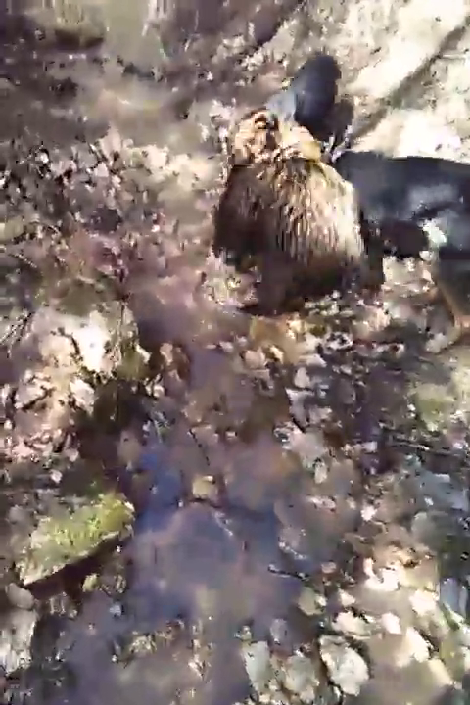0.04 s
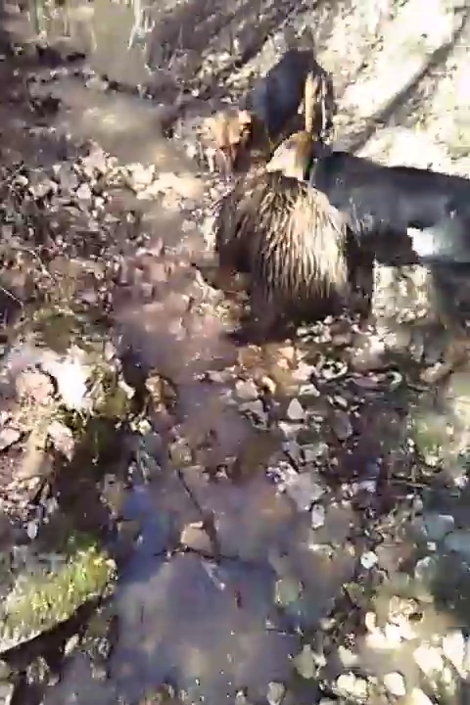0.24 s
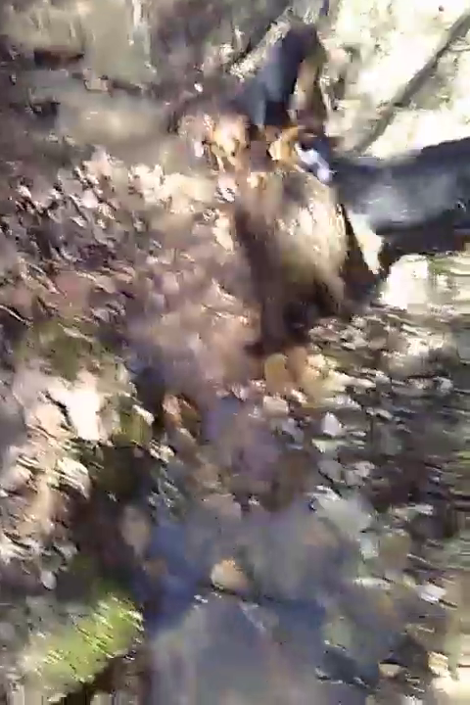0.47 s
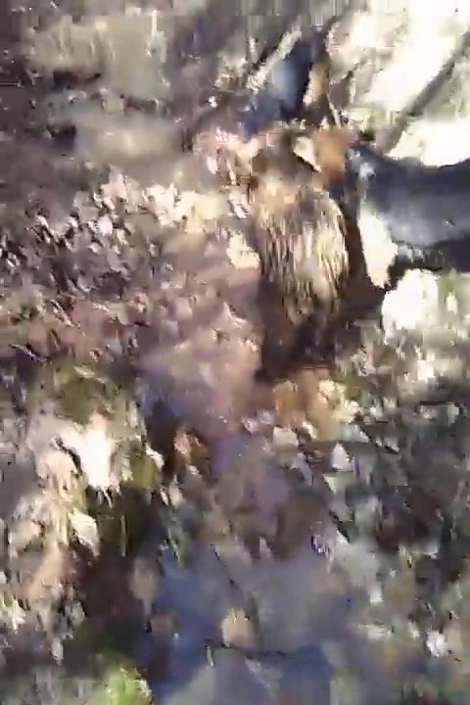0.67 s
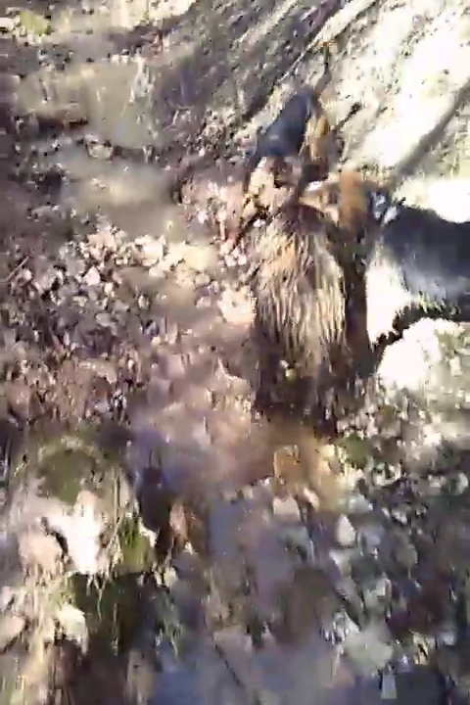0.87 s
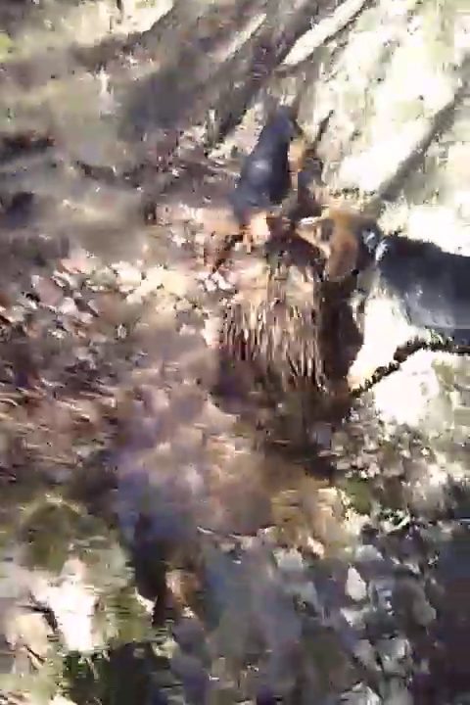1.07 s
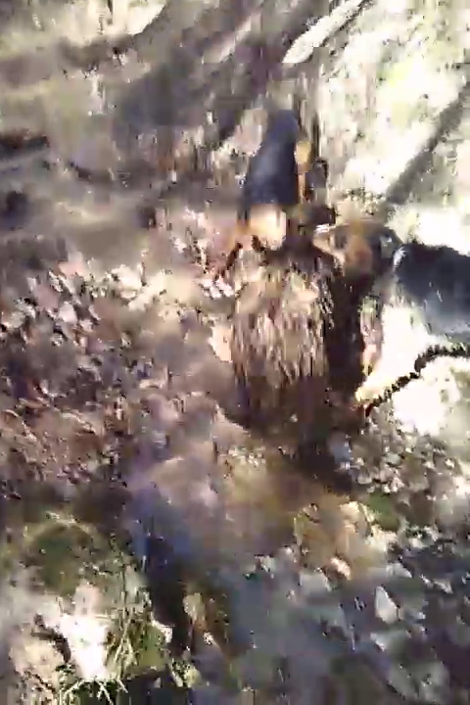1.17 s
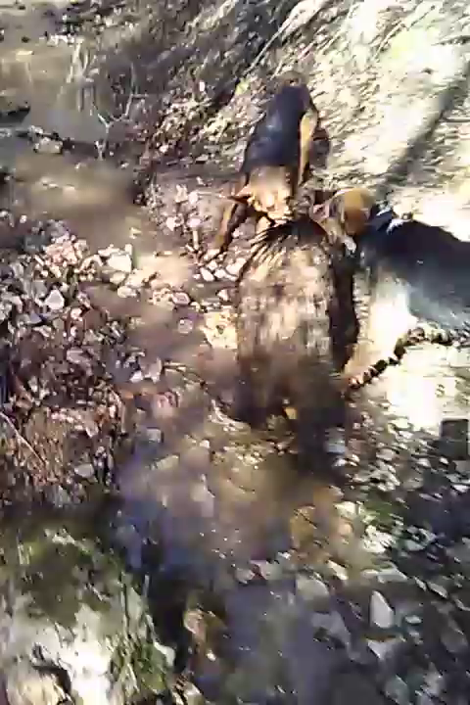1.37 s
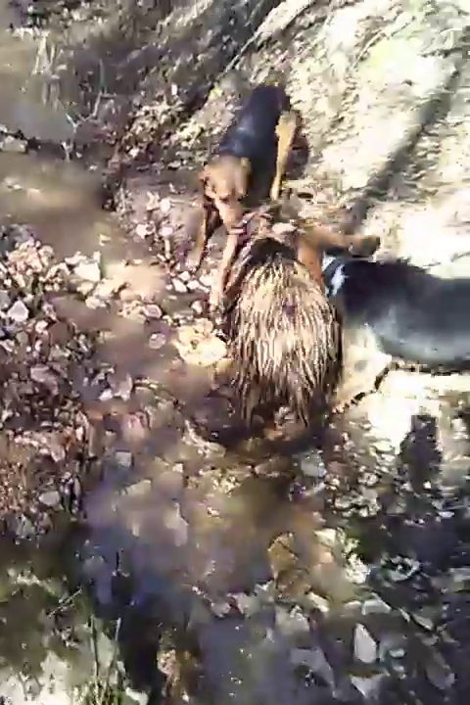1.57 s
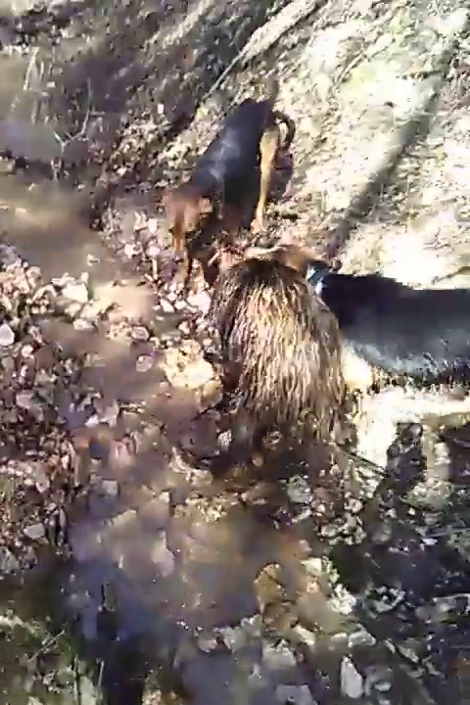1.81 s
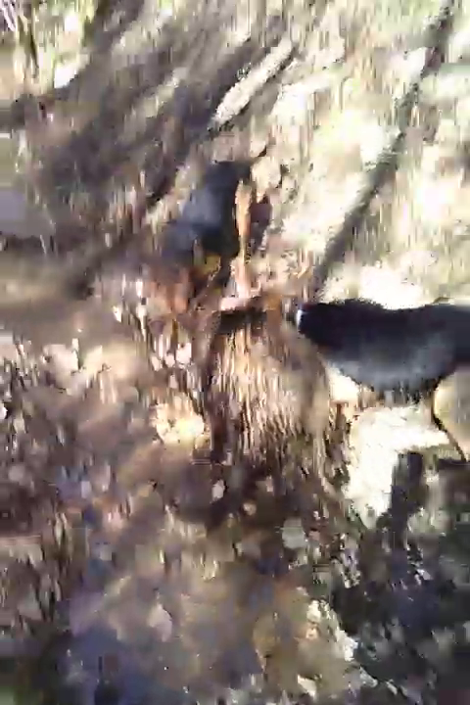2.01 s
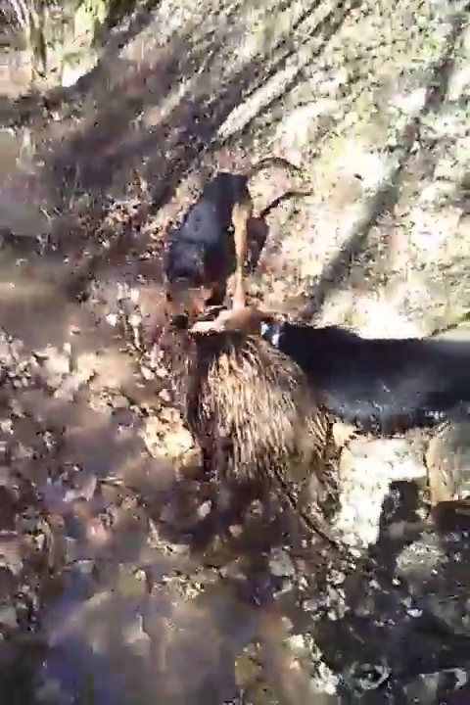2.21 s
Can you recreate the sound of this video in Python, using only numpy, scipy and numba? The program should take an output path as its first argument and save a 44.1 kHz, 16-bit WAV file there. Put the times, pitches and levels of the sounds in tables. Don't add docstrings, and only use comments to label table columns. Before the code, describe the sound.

A young boar gives one long rasping scream, rising then sinking; a dog barks once midway, another whines faintly, leaves crackle and a collar bell ticks, heard close on a hand-held phone outdoors among rocks.

```python
import sys
import numpy as np
from scipy import signal
from scipy.fft import rfft, irfft, next_fast_len
from scipy.io import wavfile
from scipy.ndimage import uniform_filter1d, map_coordinates
from numba import njit

SR = 44100
rng = np.random.default_rng(int(sys.argv[2]) if len(sys.argv) > 2 else 0)


def rack_gain(trim_db):
    fader = np.asarray(trim_db, float)
    return 10 ** (fader / 20)


def digitize_waveform(pressure):
    field = np.atleast_2d(pressure).T
    bounded = np.clip(field, -1, 1)
    quanta = np.round(bounded * 32767).astype(np.int16)
    wavfile.write(sys.argv[1], SR, quanta)


N = 99225

# (time [s], length [s], level [dB])
WIND_PUFFS = [(-.03, 0.076, -56), (0.297, 0.045, -64), (1.9, 0.074, -69), (1.64, 0.08, -60.5),
              (2.5, 0.19, -67), (.42, 0.073, -66), (1.9, 0.062, -68)]
WIND_DB, WIND_HZ, WIND_FLICKER_DB, RUMBLE_CUT_HZ = -73, 64, 4, 45

# (frequency [Hz], density [dB per Hz])
LEAF_COLOUR = [(120, -2.5), (900, -3.5), (1750, -0.5), (2500, -0.5), (4000, -8), (8300, 3), (11000, -6),
               (14000, -18.5)]
# (time [s], level [dB])
STRUGGLE_EFFORT = [
    (0, 2.5),
    (.15, 4),
    (1.6, 14),
    (1.82, -3),
    (1.87, -1),
    (1.95, 1.5),
    (2.1, -1),
    (2.25, -5.5),
]
LEAF_DB, LEAF_CUT_HZ, LEAF_SWELL_DB, LEAF_FLICKER_DB = -45.5, 246, 1, 2.5
CRACKLE_RATE, CRACKLE_SPREAD_DB, CRACKLE_DB = 900, 3, -8

# (time [s], level [dB], centre [Hz], low knock [dB])
CRACKS = [(0.384, -16, 8560, -18), (1.048, -19, 8844, -15), (1.672, -40, 4474, -27),
          (1.691, -22, 8560, -17), (1.699, -50, 8260, -43), (1.71, -43, 7750, -49), (1.783, -47, 8600, -18),
          (1.784, -22, 8600, -30), (1.832, -40, 3330, -34), (1.88, -46, 8900, -28), (1.942, -38, 8500, -11),
          (1.987, -45, 8200, -21)]
CRACK_S, CRACK_TAIL_S, CRACK_TAIL_DB, KNOCK_HZ = 0.001, 0.011, -12, 1100

# (time [s], level [dB], ring before the fur damps it [s], brightness [dB])
CLAPPER_HITS = [(0.066, -38.5, 0.02, -27), (0.125, -38.5, 0.0088, -24), (1.609, -32, 0.046, -3.5),
                (1.749, -42, 0.041, 1), (1.753, -61, 0.018, 5), (1.761, -50.5, 0.024, 9),
                (2.162, -52, .025, -13), (2.198, -42, 0.0078, -20), (2.232, -38.5, 0.055, -16)]
# (frequency [Hz], level [dB], t60 [s])
BELL_MODES = [(2380, -4.5, 0.29), (3410, -13.5, 0.29), (5655, -7.5, 0.15), (6210, 4, 0.095),
              (6790, -13, 0.039), (8600, 0, 0.096), (9800, 1, 0.044)]
BELL_DAMP_S, CLAPPER_DB = .008, 1

# (time [s], pitch [Hz], level [dB])
WHINE = [(.84, 449.4, -70), (0.899, 428, -56), (0.989, 415.5, -56.5), (1.1, 430.5, -61), (1.42, 420, -61),
         (1.46, 413, -55), (1.541, 454, -68), (1.6, 427, -72)]

# (time [s], pitch [Hz], level [dB], mouth resonance [Hz])
BARK_ARCH = [
    (0.6, 345, -29, 1300),
    (.635, 435.5, -29, 1450),
    (.655, 513.2, -26.5, 1580),
    (0.695, 594.8, -21.5, 1620),
    (.715, 568.2, -19, 1640),
    (0.736, 416.6, -20, 1180),
    (.772, 309.7, -25.5, 943),
    (.788, 316.4, -46, 1250),
    (0.861, 312, -37.5, 970),
    (0.951, 264, -49.5, 800),
]
# (share of the mouth resonance [ratio], width [Hz], level [dB])
DOG_RESONANCES = [
    (.7, 300, -0.5),
    (1.0, 380, 5.5),
    (1.45, 399, -27),
]
# (time [s], length [s], level [dB])
DOG_PANTS = [
    (1.9, 0.15, -49.5),
    (-.03, 0.1, -50),
]
# (frequency [Hz], width [Hz], level [dB])
PANT_RESONANCES = [(1180, 310, 8.5), (2200, 930, -0.5), (600, 79, 0)]
DOG_CHEST_HZ, DOG_CHEST_DB, DOG_ROUGHNESS = 392.3, -3, .45

# (time [s], pitch [Hz], level [dB], roughness [0-1], mouth resonance [Hz], mouth ring [dB])
OPENING_CRY = [(0.1, 204.6, -62, 0.26, 1180, -7), (.17, 236.1, -42.5, 0.36, 1180, 10.5),
               (.2, 245.7, -31, 0.63, 1204, 7), (0.233, 270.9, -31, 0.52, 1350, -0.5),
               (0.275, 240.8, -24.5, 0.23, 1200, -24), (0.31, 263.5, -27, 0.04, 1340, 1),
               (0.352, 273.4, -29.5, 0.03, 1384, 3.5), (0.379, 266.6, -27.5, 0.49, 1330, 3.5),
               (0.401, 218.4, -26.5, 0.68, 1250, -4), (0.446, 250, -28.5, 0.49, 1330, 1),
               (.5, 283.1, -29.5, 0.05, 1420, -4), (.585, 291.4, -27, 0.12, 1440, 3.5),
               (0.619, 311.8, -24, 0.31, 1541, 1), (0.662, 314.8, -27, 0.39, 1510, 16),
               (0.751, 319.5, -27, 0.4, 1592, 7)]
# (time [s], pitch [Hz], level [dB], roughness [0-1], mouth resonance [Hz], mouth ring [dB])
HELD_CRY = [(0.795, 312.9, -26, .5, 1560, 1.5), (0.833, 306.4, -35.5, .5, 1530, -2.5),
            (0.879, 305.7, -28.5, 0.41, 1476, 4.5), (0.949, 305.6, -27.5, 0.55, 1520, 8),
            (1.004, 310, -27, 0.33, 1545, 6), (1.03, 330, -26, 0.4, 1630, 9.5),
            (1.057, 334.7, -29.5, 0.31, 1662, 5), (1.086, 397.9, -29.5, 0.74, 1664, -4)]
# (time [s], pitch [Hz], level [dB], roughness [0-1], mouth resonance [Hz], mouth ring [dB])
SINKING_CRY = [(1.17, 437.7, -32.5, 0.72, 1323, -13), (1.299, 453.2, -25, 0.66, 1355, -14),
               (1.356, 438.3, -23.5, 0.5, 1510, 4), (1.383, 399.3, -27.5, 0.21, 1598, 6.5),
               (1.419, 396.5, -25.5, 0.22, 1575, 7), (1.44, 353.4, -25.5, 0.52, 1396, -10),
               (1.484, 345, -23, 0.66, 1421, -4), (1.53, 310.2, -26, 0.51, 1231, -3.5),
               (1.55, 309.4, -25.5, 0.41, 1232, 2), (1.582, 321.9, -27, 0.52, 1290, -3),
               (1.623, 271.4, -30.5, 0.55, 1100, -12)]
# (time [s], second resonance [Hz], third resonance [Hz], throat ring [dB], chest ring [dB])
TONGUE_SHIFTS = [(.1, 2600, 3350, 3, 21.5), (.19, 2480, 3240, -7, 0), (.27, 2600, 3400, -6.5, -17),
                 (.35, 2390, 3450, -20, -37), (.41, 2400, 3300, -13, -5.5), (.49, 2480, 3480, -24, -19),
                 (0.571, 2590, 3606, -21, -16), (.63, 2690, 3380, -12, -14), (.8, 2610, 3400, -22, -22),
                 (.95, 2620, 3500, -12, -15), (1.04, 2877, 3500, -15, -27), (1.1, 2457, 3600, -33, -36),
                 (1.2, 2546, 3410, -35, -21), (1.311, 2842, 3330, -36, -10), (1.41, 2754, 3570, -13.5, -22),
                 (1.45, 2620, 3453, -3, -21), (1.579, 2680, 3340, 0.5, -22), (1.631, 2544, 3256, 4.5, -17)]
# (frequency [Hz], width [Hz], level [dB])
UPPER_TRACT = [(4686, 590, -8), (5730, 500, 1.5), (6520, 570, -4.5), (7870, 416, 2.5), (9240, 550, -1.5),
               (10500, 1200, -13), (13000, 1200, -27.5)]
# (frequency [Hz], width [Hz])
NOSE_HOLLOWS = [(1900, 380), (4030, 220)]
TONGUE_WIDTH_HZ, TONGUE_DB = (280, 300), (1, 5)
MOUTH_WIDTH_HZ, TRACT_FOLLOW = 130, .15
THROAT_SHARE, THROAT_WIDTH_HZ = 0.62, 276
CHEST_HZ, CHEST_WIDTH_HZ, BOAR_CUT_HZ, RELEASE_S = 455, 290, 230, .012
WAVER_DB, THROAT_WAVER_DB, WAVER_RATE, WANDER = 2.6, 2.5, 24, .025

JITTER, SHIMMER_DB, BREATH_DB, BREATH_GATE, BREATH_FLOOR = .1, 6, -5, .6, .1
SMEAR_S, SMEAR_HZ = .0017, 400

# (frequency [Hz], left minus right [dB], left phase [rad], shared part [0-1])
LEFT_PORT = [(59.6, -5, -5, 0.91), (215, 1, -3.5, 1), (345, -5.5, -3, 0.88), (527, -3, -3, 0.91),
             (800, -5.5, -4, 0.81), (1080, -4, -4, 0.58), (1340, -6, -5, 0.86), (1860, 1, -4, 0.45),
             (1894, 0.5, -3.5, 0.36), (2280, 1.5, -5, 0.97), (2600, 2, -5.5, 0.91), (2980, -5, -7.5, 1),
             (3500, -3.5, -8, 0.43), (4240, -4, -6.5, 0.16), (6260, -16.5, -26, 0), (8900, -21.5, 25, .05),
             (12370, 2, -17.5, 0)]
ROCK_T60_S, ROCK_DB = .16, -13
SCATTER_S, SWAY_S, TOP_HZ = .004, .0003, 14400


@njit
def svf(x, hz, width):
    y, b, l = np.empty(len(x)), 0., 0.
    for i in range(len(x)):
        g, k = np.tan(np.pi * hz[i] / SR), width / hz[i]
        v = (b + g * (x[i] - l)) / (1 + g * (g + k))
        b, l, y[i] = 2 * v - b, l + 2 * g * v, k * v
    return y


def band(x, hz, width_hz):
    f = np.clip(hz + np.zeros(len(x)), 20, .45 * SR)
    return svf(svf(x, f, 1.93 * width_hz), f, 1.93 * width_hz)


def highpass(x, order, hz):
    return signal.sosfilt(signal.butter(order, hz, "high", fs=SR, output="sos"), x)


def unit(x):
    return x / np.sqrt(np.mean(x ** 2))


def walk(rate):
    k = int(SR / rate)
    return unit(uniform_filter1d(uniform_filter1d(rng.standard_normal(N), k), k))


def swell(t, start, length):
    return np.sin(np.pi * np.clip((t - start) / length, 0, 1)) ** 2


@njit
def folds(hz, jitter, shimmer, chance):
    out, phase, p, k = np.zeros(len(hz) + 16), np.empty(len(hz)), 0., 0
    for i in range(len(hz)):
        step = hz[i] * np.exp(jitter[i] * chance[k, 0]) / SR
        p += step
        if p >= 1:
            p, k = p - 1, k + 1
            for j in range(16):
                u = j - 8 + p / step
                out[i + j] += np.exp(shimmer[i] * chance[k, 1]) * np.sinc(u) * np.cos(np.pi * u / 17) ** 2
        phase[i] = p
    return out[8:-8], phase


def larynx(hz, rough):
    rough = np.clip(rough, 0, 1)
    chance = rng.standard_normal((N // 40, 2))
    chance[:, 0] = chance[:, 0] / 2 + uniform_filter1d(chance[:, 0], size=3)
    jitter = JITTER * rough ** 1.5 + 0.00259
    shimmer = SHIMMER_DB * rough * np.log(10) / 20
    clicks, phase = folds(hz, jitter, shimmer, chance)
    gated_air = np.exp(-phase / BREATH_GATE) * rng.standard_normal(N)
    breath = np.diff(unit(gated_air), prepend=0)
    f = np.arange(N // 2 + 1) * SR / N
    smear = np.exp(-2j * np.pi * SMEAR_S * (f + SMEAR_HZ * np.sin(f / SMEAR_HZ)))
    clicks = irfft(rfft(clicks * np.sqrt(SR / hz)) * smear, N)
    return np.sqrt(1 - 0.98 * rough) * clicks + rack_gain(BREATH_DB) * (rough + BREATH_FLOOR) * breath


def wind(t):
    puffs = rack_gain(WIND_DB) + sum(rack_gain(db) * swell(t, start, length) for start, length, db in WIND_PUFFS)
    rumble = unit(band(rng.standard_normal(N), WIND_HZ, 63.0))
    return highpass(rumble * puffs * rack_gain(WIND_FLICKER_DB * walk(7.1)), 2, RUMBLE_CUT_HZ)


def leaves(t):
    struck = rng.random(N) < CRACKLE_RATE / SR
    grains = struck * rack_gain(CRACKLE_SPREAD_DB * rng.exponential(size=N)) * rng.standard_normal(N)
    raw = rng.standard_normal(N) + rack_gain(CRACKLE_DB) * unit(grains)
    colour_hz, colour_db = np.array(LEAF_COLOUR).T
    out, shared = 0, walk(1.9)
    for hz in 120 * 2 ** np.arange(0, 7.1, .5):
        db = np.interp(np.log(hz), np.log(colour_hz), colour_db)
        db = db + LEAF_SWELL_DB * shared + LEAF_FLICKER_DB * walk(7.5)
        out = -out + rack_gain(db) * band(raw, hz, hz / 3)
    return unit(out) * rack_gain(LEAF_DB + np.interp(t, *np.array(STRUGGLE_EFFORT).T))


def snaps(t):
    out, u = np.zeros(N), t[:2048]
    decay = np.exp(-u / CRACK_S) + rack_gain(CRACK_TAIL_DB) * np.exp(-u / CRACK_TAIL_S)
    for start, db, hz, knock_db in CRACKS:
        burst = decay * rng.standard_normal(len(u))
        crack = band(burst, hz, 0.24 * hz)
        knock = rack_gain(knock_db + 7) * band(burst, KNOCK_HZ, 870.0)
        i = int(start * SR)
        out[i:i + len(u)] += rack_gain(db + 12) * (crack + knock)
    return out


def bell(t):
    out, (hz, db, t60) = np.zeros(N), np.array(BELL_MODES).T[:, :, None]
    chance = rng.random((len(CLAPPER_HITS), len(BELL_MODES)))
    for (start, level_db, ring, bright_db), turn in zip(CLAPPER_HITS, chance):
        i = int(start * SR)
        u = t[i:i + SR // 8] - start
        modes = rack_gain(db + bright_db * (hz > 3000)) * np.exp(-np.log(1000) * u / t60)
        modes = modes * np.sin(2 * np.pi * (hz * u + turn[:, None]))
        onset = 1 - np.exp(-u / 0.00054)
        fur = np.exp(-np.maximum(u - ring, 0) / BELL_DAMP_S)
        tick = rack_gain(CLAPPER_DB) * np.exp(-u / 0.0018) * np.diff(rng.standard_normal(len(u) + 1))
        out[i:i + len(u)] += rack_gain(level_db + 6.0) * (modes.sum(0) * onset * fur + tick)
    return out


def moan(t):
    s, hz, db = np.array(WHINE).T
    hz = np.interp(t, s, hz)
    level = rack_gain(np.interp(t, s, db, left=-120, right=-120) + 7.5)
    return unit(band(larynx(hz, DOG_ROUGHNESS + 0 * t), hz, 90.0)) * level


def bark(t):
    s, *cols = np.array(BARK_ARCH).T
    hz, db, mouth = (np.interp(t, s, c) for c in cols)
    source = larynx(hz, DOG_ROUGHNESS + 0 * t)
    voice = -rack_gain(DOG_CHEST_DB) * band(source, DOG_CHEST_HZ, 190.0)
    for k, (share, width, level_db) in enumerate(DOG_RESONANCES):
        voice = voice + (-1) ** k * rack_gain(level_db) * band(source, share * mouth, width)
    edge = np.clip((t - s[0]) / 0.011, 0, 1) * np.clip((s[-1] - t) / 0.02, 0, 1)
    return voice * edge * rack_gain(db + 14.5)


def pants(t):
    air = rng.standard_normal(N)
    pant = unit(sum(rack_gain(db) * band(air, hz, width) for hz, width, db in PANT_RESONANCES))
    effort = sum(rack_gain(db) * swell(t, start, length) ** .5 for start, length, db in DOG_PANTS)
    return pant * rack_gain(2.9 * walk(29)) * effort


def boar(t):
    s, *cols = np.array(OPENING_CRY + HELD_CRY + SINKING_CRY).T
    hz, db, rough, mouth, ring = (np.interp(t, s, c) for c in cols)
    at, *cols = np.array(TONGUE_SHIFTS).T
    *tongue, throat_db, chest_db = (np.interp(t, at, c) for c in cols)
    source = larynx(hz, rough)
    stretch = (mouth / 1400) ** TRACT_FOLLOW
    upper = list(zip(tongue, TONGUE_WIDTH_HZ, TONGUE_DB))
    upper += [(f * stretch, width, d) for f, width, d in UPPER_TRACT]
    voice = 0
    for k, (f, width, d) in enumerate(upper):
        gain = (-1) ** k * rack_gain(d + WAVER_DB * walk(WAVER_RATE))
        voice = voice + gain * band(source, f * (1 + WANDER * walk(26.7)), width)
    voice = voice - rack_gain(ring + 3) * band(source, mouth, MOUTH_WIDTH_HZ)
    voice = voice - rack_gain(chest_db) * band(source, CHEST_HZ, CHEST_WIDTH_HZ)
    throat = band(source, THROAT_SHARE * mouth, THROAT_WIDTH_HZ)
    voice = voice + rack_gain(throat_db + THROAT_WAVER_DB * walk(WAVER_RATE)) * throat
    for f, width in NOSE_HOLLOWS:
        voice = voice - svf(voice, f * (1 + WANDER * walk(8)), 1. * width)
    release = np.exp(-np.maximum(t - s[-1], 0) / RELEASE_S)
    return highpass(voice, 2, BOAR_CUT_HZ) * rack_gain(db + 10.5) * (t > s[0]) * release


def scatter(tau, size):
    u = np.arange(SR // 2) / SR
    echo = np.exp(-u / tau) * rng.standard_normal(SR // 2)
    return rfft(echo / np.sqrt(np.sum(echo ** 2)), size)


def rocks(near, size):
    echo = rack_gain(ROCK_DB) * scatter(ROCK_T60_S / np.log(1000), size)
    return irfft(rfft(near, size) * (1 + echo), size)[:N]


def ground_and_air(t):
    return highpass(leaves(t), 4, LEAF_CUT_HZ) + wind(t)


def left_port(t, near, right, size):
    swayed = map_coordinates(near, [(t - SWAY_S * walk(16.4)) * SR], mode="mirror")
    round_hand = rfft(swayed, size) * scatter(SCATTER_S, size) + rfft(ground_and_air(t), size)
    hz, *cols = np.array(LEFT_PORT).T
    log_f = np.log(np.arange(size // 2 + 1) * SR / size + 1)
    db, turn, shared = (np.interp(log_f, np.log(hz), c) for c in cols)
    shared = np.clip(shared, 0, 1)
    straight = shared * np.exp(1j * turn) * rfft(right, size)
    left = rack_gain(db) * (straight + np.sqrt(1 - shared ** 2) * round_hand)
    return irfft(left, size)[:N]


def scene():
    t = np.arange(N) / SR
    size = next_fast_len(N + SR // 2)
    near = rocks(snaps(t) + bell(t) + moan(t) + bark(t) + pants(t) + boar(t), size)
    right = near + ground_and_air(t)
    return np.array([left_port(t, near, right, size), right])


def band_limit(x):
    return signal.sosfilt(signal.butter(12, 15980, fs=SR, output="sos"), x)


def record(dry):
    mix = signal.sosfilt(signal.ellip(8, .2, 70, TOP_HZ, fs=SR, output="sos"), dry)
    return band_limit(mix)


dry = scene()
out = record(dry)
digitize_waveform(out)
```